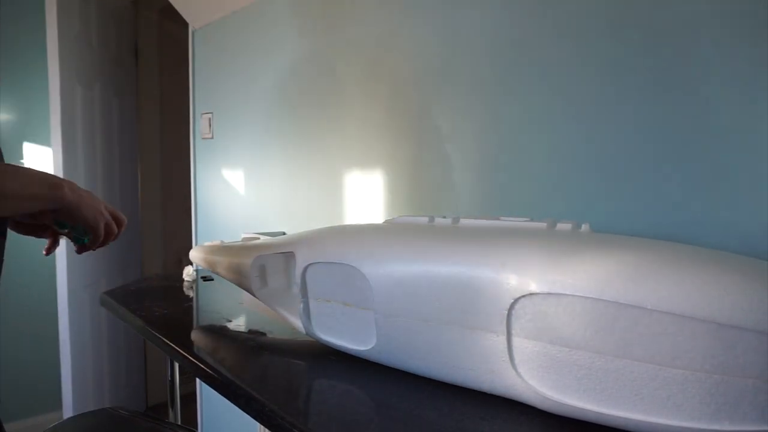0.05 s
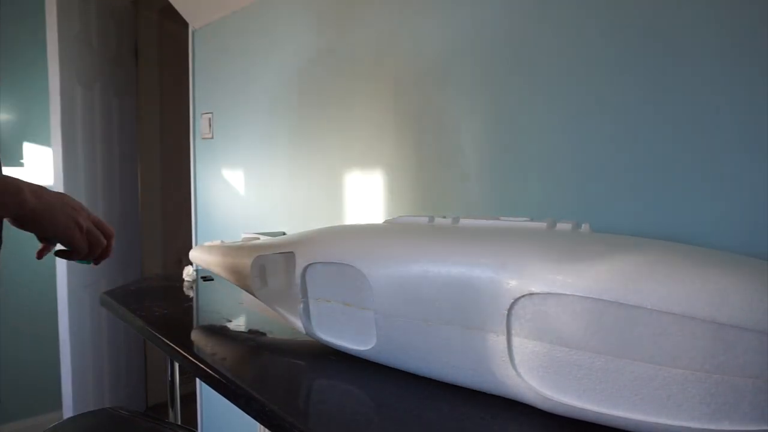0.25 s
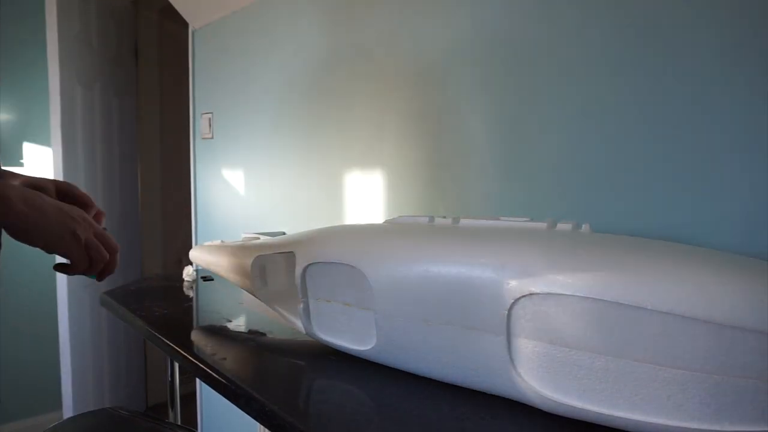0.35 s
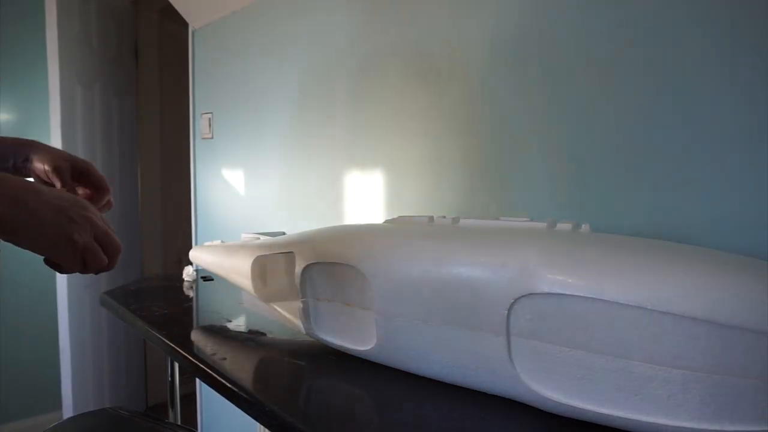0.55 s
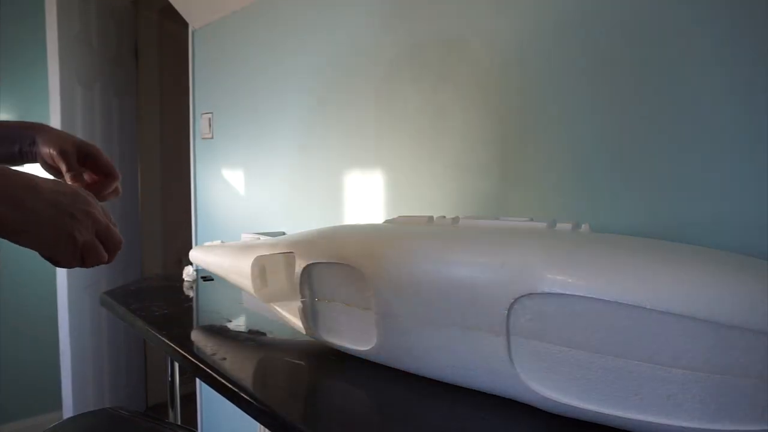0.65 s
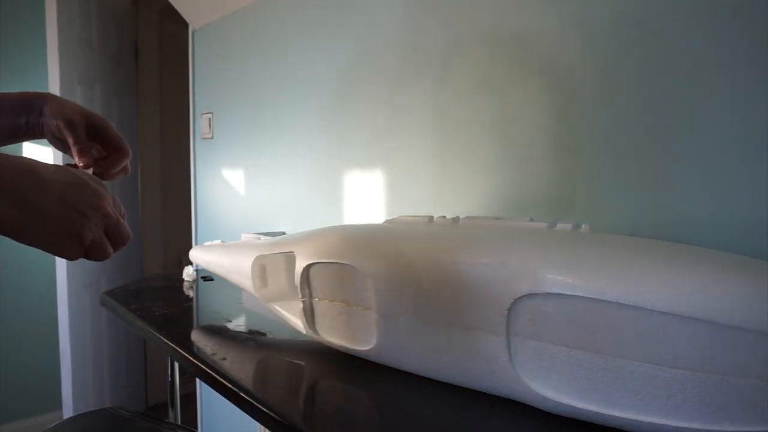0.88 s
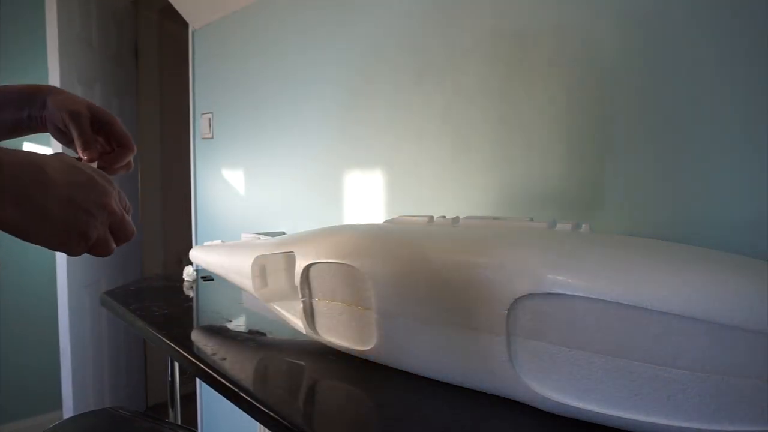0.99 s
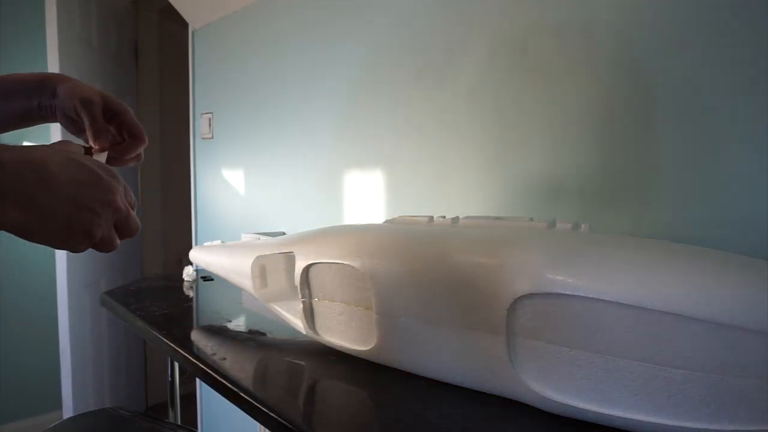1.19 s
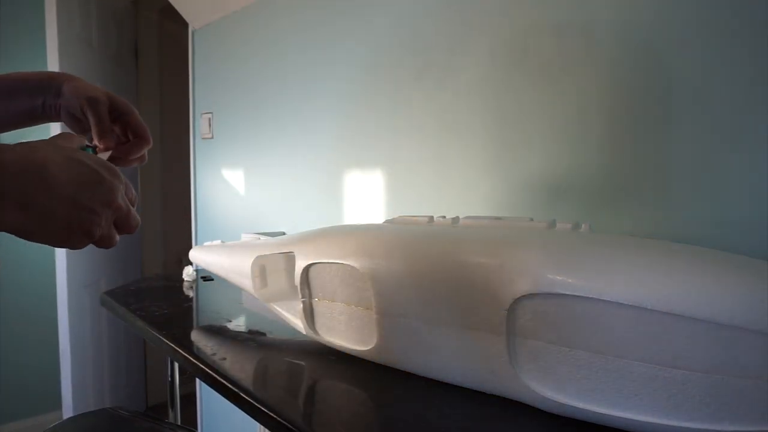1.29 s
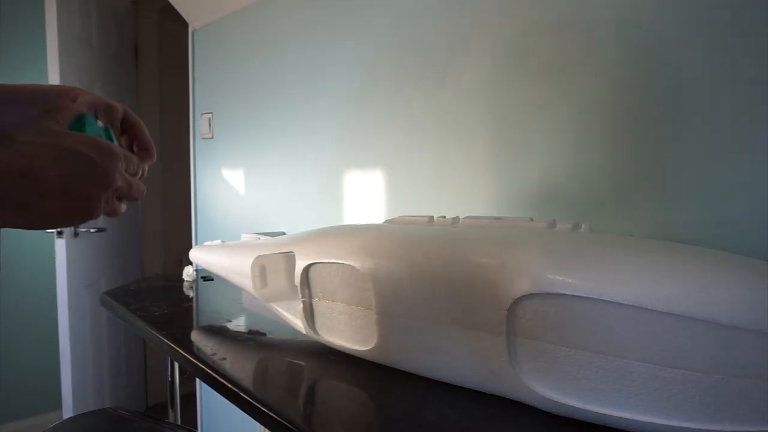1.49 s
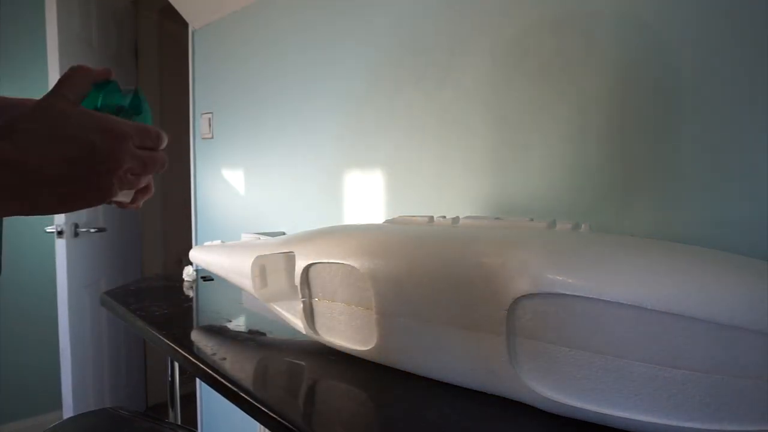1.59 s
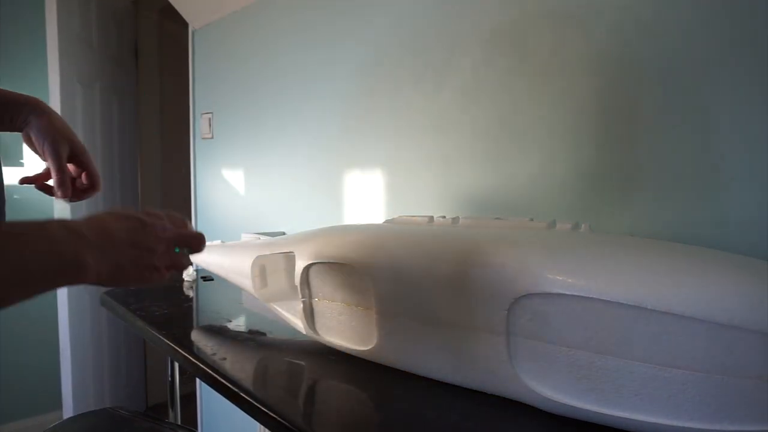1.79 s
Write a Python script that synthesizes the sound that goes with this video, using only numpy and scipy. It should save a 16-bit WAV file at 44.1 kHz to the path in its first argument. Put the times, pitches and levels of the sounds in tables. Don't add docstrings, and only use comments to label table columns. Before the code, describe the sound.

A harsh tearing pull of sticky tape, echoing off bare walls, followed by a shorter, softer snap

```python
import sys
import numpy as np
from scipy import signal
from scipy.fft import rfft, irfft, next_fast_len
from scipy.io import wavfile
from scipy.ndimage import uniform_filter1d

SR = 44100
rng = np.random.default_rng(int(sys.argv[2]) if len(sys.argv) > 2 else 0)


def persist_wave(psi):
    counts = np.round(np.clip(psi, -1, 1) * 32767).astype(np.int16)
    wavfile.write(sys.argv[1], SR, np.atleast_2d(counts).T)


def to_linear_factor(level_db):
    exponent = np.asarray(level_db, float) / 20
    return 10 ** exponent


N = 81585
T = np.arange(N) / SR


def long_pull():
    # start_s, level_db, slips_per_s, ring_share (0-1), ring_hz, flap_db
    pull_path = [
        (.223, -34.5, 400, 0.07, 2820, -33),
        (.251, -23.5, 800, 0, 3080, -25),
        (.286, -7.5, 2100, 0, 2778, -19),
        (.321, -9, 3800, 0.36, 3360, -28),
        (.381, -7, 11000, 0.34, 3290, -26),
        (.431, -8, 4000, 0.02, 3160, -16.5),
        (.481, -12, 2600, 0.17, 3090, -14),
        (.511, -19, 2000, 0.06, 3200, -11.5),
        (.541, -31, 3000, 0.6, 3100, -18),
    ]
    # start_s, level_db, ring_share (0-1)
    first_slips = [
        (.2151, -15.5, .05),
        (.2205, -14.5, 0),
        (.232, -18, .4),
        (.2395, -11, .8),
        (.2445, -8, 0.1),
        (.259, -17.5, .6),
        (.266, -5, .2),
        (.2695, -3.5, 0),
    ]
    # pitch_hz, level_db (per Hz)
    crack_colour = [(250, -55), (600, -31), (1300, -18.5), (2100, -3.5), (4200, -7.5), (5800, 3),
                    (7500, -0.5), (10500, -0.5)]
    ring_width_hz = 700
    lone = slips(first_slips, crack_colour, 3050, ring_width_hz)
    return rasp(pull_path, crack_colour, ring_width_hz) + lone


def short_snap():
    # start_s, level_db, slips_per_s, ring_share (0-1), ring_hz, flap_db
    snap_path = [
        (1.514, -44, 4500, 0.3, 3800, -30.5),
        (1.53, -37, 720, 0, 3800, -4),
        (1.533, -21, 6000, 0.15, 3900, -22.5),
        (1.545, -19.5, 8900, 0.33, 3900, -21.5),
        (1.57, -28, 1700, 0.4, 3900, -34.5),
        (1.6, -43, 500, 0.6, 3900, 7),
    ]
    # start_s, level_db, ring_share (0-1)
    snap_slips = [
        (1.5143, -18, .03),
        (1.517, -23, .05),
        (1.5195, -16, .03),
        (1.525, -24, .1),
        (1.529, -23, .3),
        (1.5319, -7, .03),
        (1.5353, -2, .02),
        (1.5385, -10, .1),
        (1.5426, -7, .1),
        (1.8, -33, .1),
    ]
    # pitch_hz, level_db (per Hz)
    crack_colour = [(250, -12), (450, -11.5), (700, -17), (1000, -10.5), (3000, -4.5), (4600, -2.5),
                    (7500, -2), (10300, 2.5)]
    ring_width_hz = 330
    lone = slips(snap_slips, crack_colour, 3850, ring_width_hz)
    return rasp(snap_path, crack_colour, ring_width_hz) + lone


def peels():
    # start_s, level_db, pitch_hz, width_hz
    peel_list = [
        (.076, -44, 6440, 1500),
        (0.077, -47, 2400, 1500),
        (.185, -43, 2238, 764),
        (1.1723, -40.5, 10140, 5000),
        (1.172, -40, 6000, 7900),
        (1.187, -39.5, 3037, 5030),
    ]
    puffs = [resonate(bursts([s], [db], 0.014), hz, width_hz) for s, db, hz, width_hz in peel_list]
    return sum(puffs)


def rasp(rows, spectrum, width_hz):
    s, *columns = np.transpose(rows)
    db, rate, share, hz, flap_db = [np.interp(T, s, c) for c in columns]
    share = np.clip(share, 0, 1)
    size_spread_db, slip_t60_s = 4.0, .004
    sizes = to_linear_factor(size_spread_db * np.minimum(rng.exponential(1, N), 4))
    born = sizes * (rng.random(N) < rate / SR) / np.sqrt(rate / 1000)
    dying = signal.lfilter([1], [1, -to_linear_factor(-60 / (slip_t60_s * SR))], born + 1e-18)
    slip = rms_one(dying * rng.standard_normal(N))
    slip = slip * to_linear_factor(db + 0.5 * drift(57.0)) * ((T > s[0]) & (T < s[-1]))
    crack = colour(slip * np.sqrt(1 - share), spectrum)
    ring = glide(slip * np.sqrt(share), hz, width_hz)
    flap_hz = 1015
    flap = resonate(resonate(slip * to_linear_factor(flap_db), flap_hz, 3000), flap_hz, 3600.0)
    return crack + ring + flap


def slips(rows, spectrum, hz, width_hz):
    s, db, share = np.transpose(rows)
    share = np.clip(share, .01, .99)
    slip_t60_s = .008
    crack = bursts(s, db + 10 * np.log10(1 - share), slip_t60_s)
    ring = bursts(s, db + 10 * np.log10(share), slip_t60_s)
    return colour(crack, spectrum) + resonate(ring, hz, width_hz)


def bursts(s, db, t60):
    starts = np.zeros(N)
    np.add.at(starts, (np.array(s) * SR).astype(int), to_linear_factor(np.array(db)))
    dying = signal.lfilter([1], [1, -to_linear_factor(-60 / (t60 * SR))], starts + 1e-18)
    return dying * rng.standard_normal(N)


def resonate(x, hz, width_hz):
    r = np.exp(-np.pi * width_hz / SR)
    poles = [1, -2 * r * np.cos(2 * np.pi * hz / SR), r * r]
    return np.sqrt((1 - r * r) / 2) * signal.lfilter([1, 0, -1], poles, x + 1e-18)


def glide(x, hz, width_hz):
    r, out, state = np.exp(-np.pi * width_hz / SR), np.zeros(N), np.zeros(2)
    block = 128
    for i in range(0, N, block):
        poles = [1, -2 * r * np.cos(2 * np.pi * hz[i] / SR), r * r]
        out[i:i + block], state = signal.lfilter([1, 0, -1], poles, x[i:i + block] + 1e-18, zi=state)
    return np.sqrt((1 - r * r) / 2) * out


def colour(x, spectrum):
    gain = rms_one(to_linear_factor(at_hz(spectrum, np.fft.rfftfreq(N, 1 / SR))))
    return irfft(rfft(x) * gain, N)


def at_hz(points, hz):
    table_hz, values = np.array(points)[:, 0], np.array(points)[:, 1]
    return np.interp(np.log(hz + 1), np.log(table_hz), values)


def rms_one(x):
    return x / np.sqrt(np.mean(x ** 2) + 1e-20)


def drift(rate):
    r = np.exp(-2 * np.pi * rate / SR)
    wander = signal.lfilter([1], [1, -2 * r, r * r], rng.standard_normal(N + SR))
    return rms_one(wander[SR:])


def from_left(x):
    left_db, lag_s, shadow_hz = 3, .00006, 7000
    late = np.interp(T - lag_s, T, x)
    dull = signal.lfilter(*signal.butter(1, shadow_hz, fs=SR), late)
    return np.array([x * to_linear_factor(left_db), dull * to_linear_factor(-left_db)])


def room(x):
    # pitch_hz, t60_s
    echo_t60 = [(250, 0.59), (1000, 0.58), (3000, 0.52), (6000, 0.54), (11000, 0.39)]
    echo_db, rise_s, alike_hz = 5, 0.002, 1500
    t, echo = np.arange(SR) / SR, 0
    edges = 180 * 2 ** np.arange(0, 6.6, .5)
    white = rng.standard_normal((2, 2, SR))
    for k, (low, high) in enumerate(zip(edges, edges[1:])):
        band = signal.butter(2, [low, high], "band", fs=SR, output="sos")
        mid, side = signal.sosfilt(band, white[k % 2])
        alike = 1 / (1 + (low / alike_hz) ** 2)
        dying = to_linear_factor(-60 * t / at_hz(echo_t60, np.sqrt(low * high))) * (1 - np.exp(-t / rise_s))
        echo = echo + dying * (np.sqrt(1 + alike) * mid + np.sqrt(1 - alike) * side * [[1], [-1]])
    echo = echo / np.sqrt(np.sum(echo ** 2) / 2)
    size = next_fast_len(N + SR)
    return to_linear_factor(echo_db) * irfft(rfft(echo, size) * rfft(x, size), size)[:, :N]


def lens_ticks():
    # start_s, level_db
    tick_list = [
        (0.023, -57.5),
        (0.091, -62.5),
        (0.121, -57),
        (0.153, -57.5),
        (0.953, -56.5),
        (1.021, -63.5),
        (1.152, -60),
        (1.224, -56),
    ]
    s, db = np.transpose(tick_list)
    tick_hz = 556
    return 5.0 * resonate(resonate(bursts(s, db, 0.016), tick_hz, 233), tick_hz, 1790.0)


def hum():
    # start_s, level_db
    swell = [(0, 1), (.14, -0.5), (.6, 1.5), (.9, 5), (1.06, -0.5), (1.15, 8), (1.35, 4.5), (1.45, -0.5),
             (1.62, -2.5), (1.7, 2.5), (1.85, 0)]
    hum_hz, overtone_hz = 149, 260.7
    low = rms_one(resonate(resonate(rng.standard_normal(N), hum_hz, 24), hum_hz, 70.0))
    high = rms_one(resonate(resonate(rng.standard_normal(N), overtone_hz, 40.0), overtone_hz, 120.0))
    lumps_db = 1.5 * drift(7.0)
    return to_linear_factor(-46.5 + np.interp(T, *np.transpose(swell)) + lumps_db) * (low + to_linear_factor(-6.5) * high)


def air():
    # pitch_hz, level_db (per Hz)
    air_colour = [(30, -10), (120, -9.5), (290, -5), (700, -13.5), (1500, -21), (5000, -24), (10500, -23.5)]
    # pitch_hz, likeness (0-1)
    likeness = [(60, 0.63), (350, 0.25), (1500, 0.11), (4000, 0.015)]
    alike = np.clip(at_hz(likeness, np.fft.rfftfreq(N, 1 / SR)), 0, 1)
    mid, side = [rfft(colour(v, air_colour)) for v in rng.standard_normal((2, N))]
    both = np.sqrt(1 + alike) * mid + np.sqrt(1 - alike) * side * [[1], [-1]]
    return to_linear_factor(-45) * rms_one(irfft(both, N))


def scene():
    tape = long_pull() + short_snap() + peels()
    low_cut = signal.butter(6, 325, "high", fs=SR, output="sos")
    tape = signal.sosfilt(low_cut, tape)
    sway = 2 * np.pi * 9.0 * T
    echoes = room(tape * np.cos(sway)) + room(tape * np.sin(sway))
    return to_linear_factor(6.0) * (from_left(tape) + echoes) + air() + hum() + lens_ticks()


def duck(x, from_db, share, attack_s, recover_db_per_s):
    level_db = 10 * np.log10(uniform_filter1d(np.mean(x ** 2, axis=0), size=1024) + 1e-12)
    over = share * np.maximum(level_db - from_db, 0)
    held = np.maximum.accumulate(over + recover_db_per_s * T) - recover_db_per_s * T
    r = np.exp(-1 / (attack_s * SR))
    return x * to_linear_factor(-signal.lfilter([1 - r], [1, -r], held))


def band_limit(x):
    return signal.sosfilt(signal.butter(12, 12320, fs=SR, output="sos"), x)


def record(dry):
    x = duck(dry, from_db=-23, share=0.54, attack_s=0.1, recover_db_per_s=3.96)
    x = duck(x, from_db=-13.5, share=.85, attack_s=.01, recover_db_per_s=240)
    clip_top = .9
    x = x / (1 + (x / clip_top) ** 8) ** (1 / 8)
    top_cut = signal.ellip(10, .5, 55, 11120, fs=SR, output="sos")
    x = signal.sosfilt(top_cut, x)
    return band_limit(x)


dry = scene()
out = record(dry)
persist_wave(out)
```